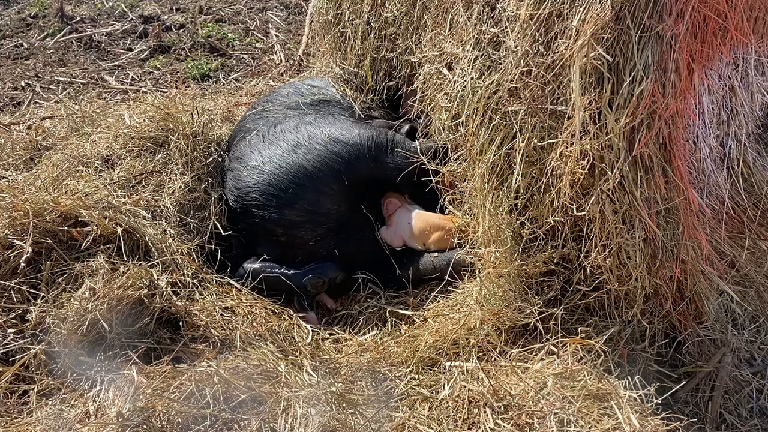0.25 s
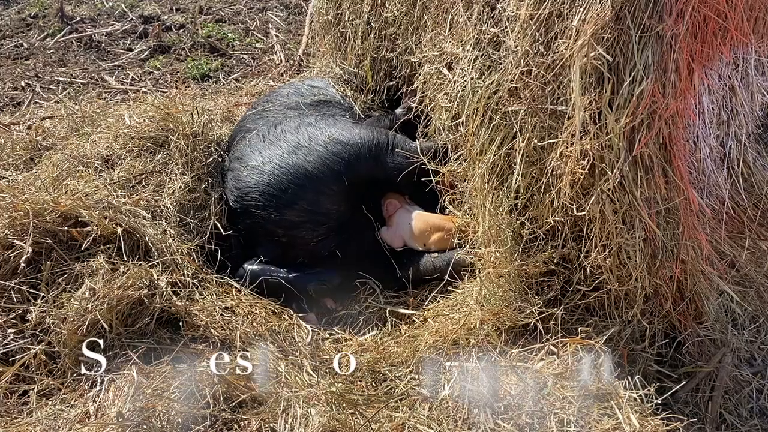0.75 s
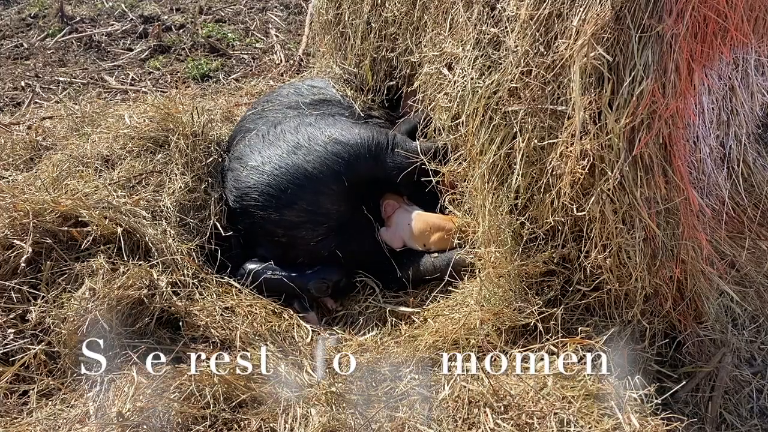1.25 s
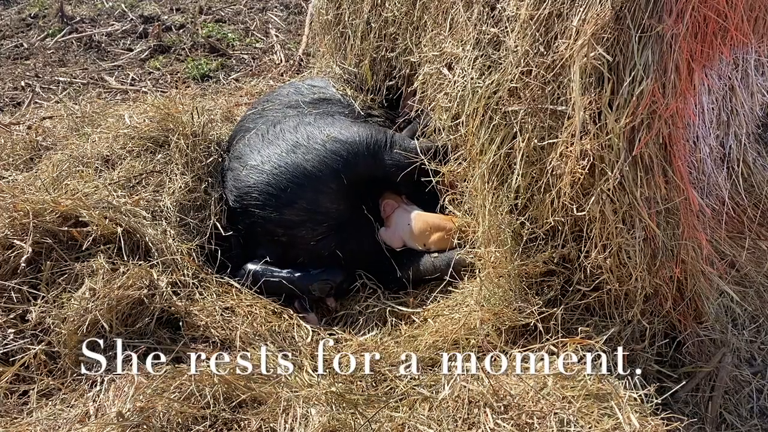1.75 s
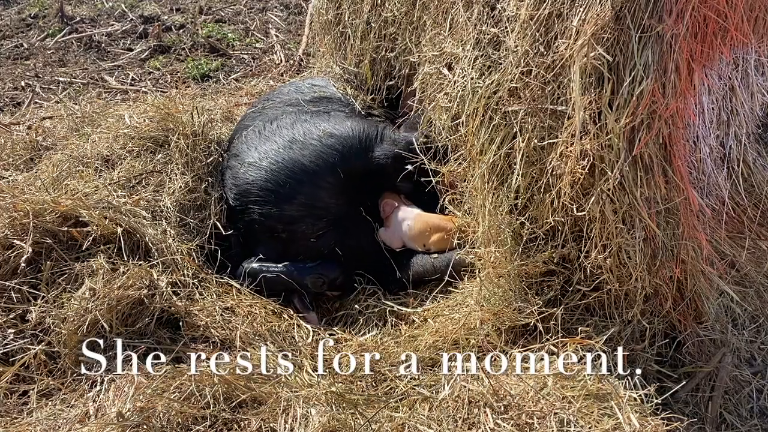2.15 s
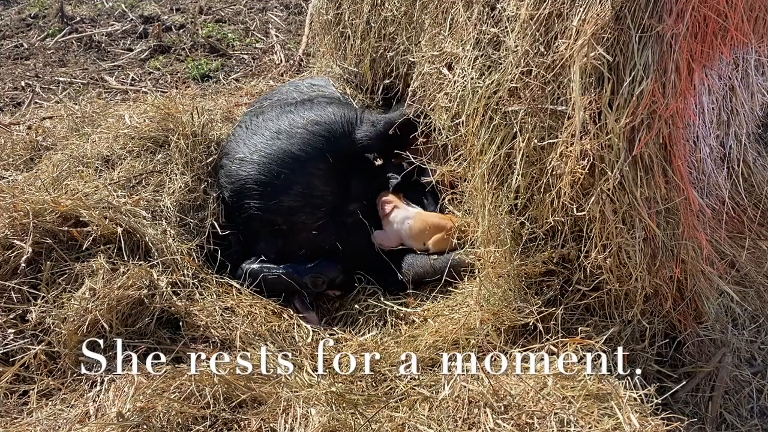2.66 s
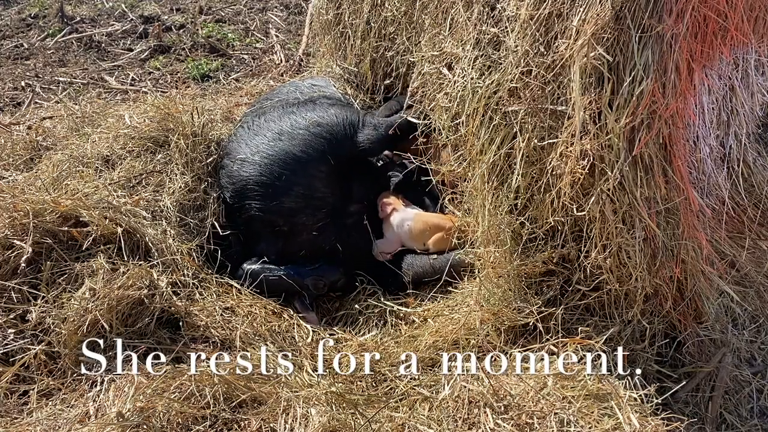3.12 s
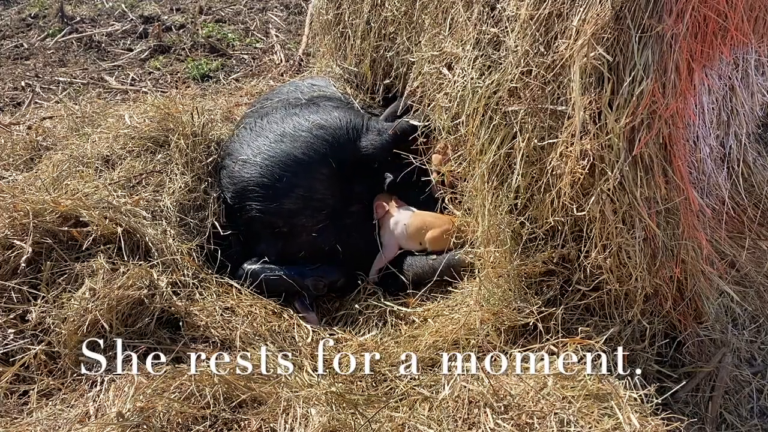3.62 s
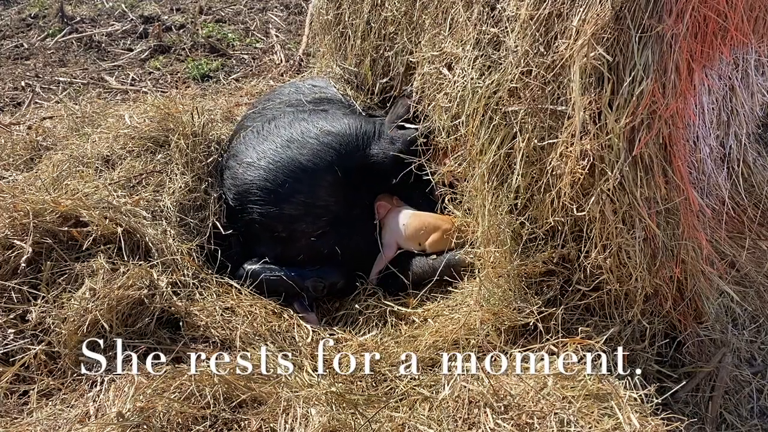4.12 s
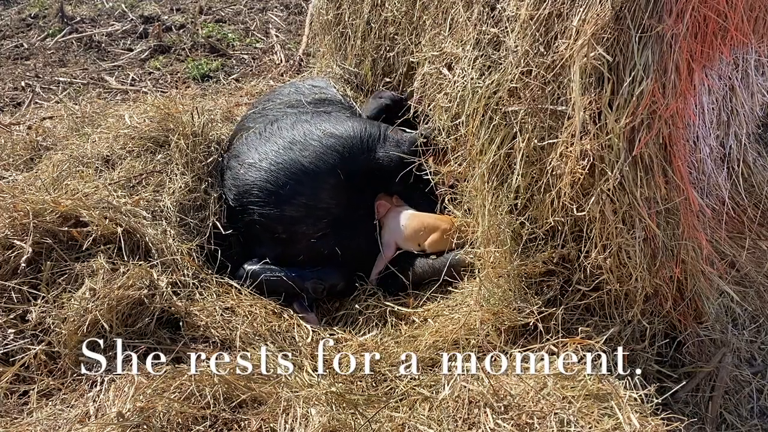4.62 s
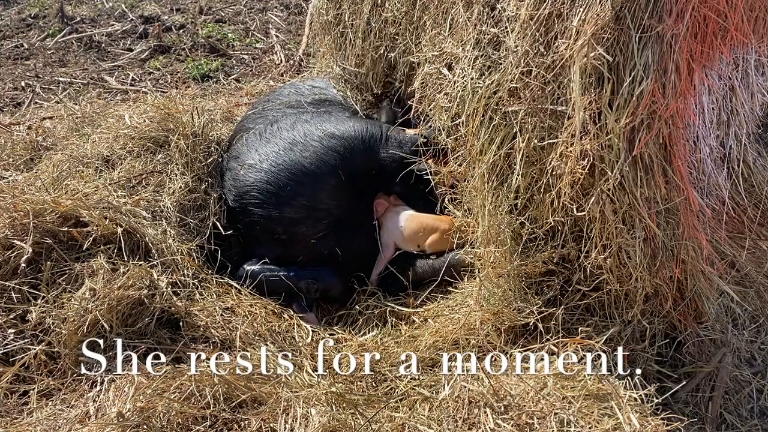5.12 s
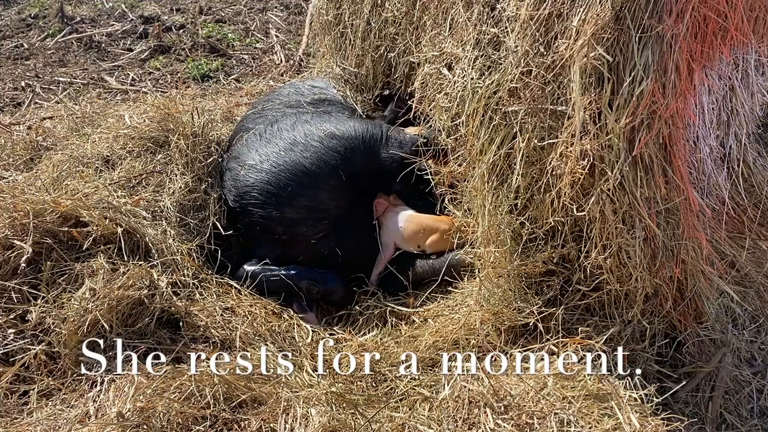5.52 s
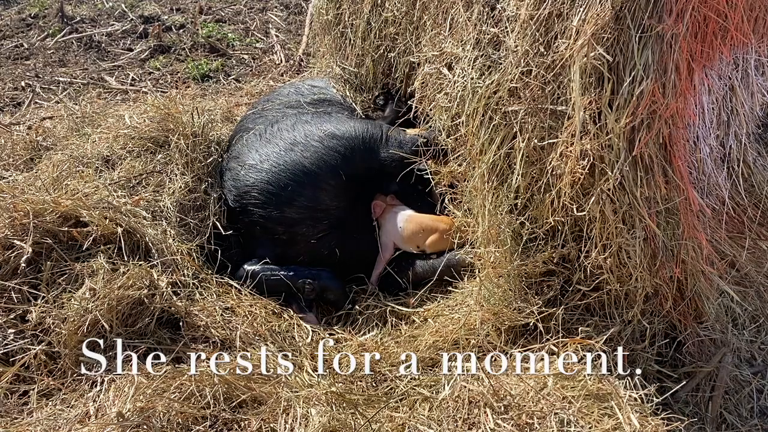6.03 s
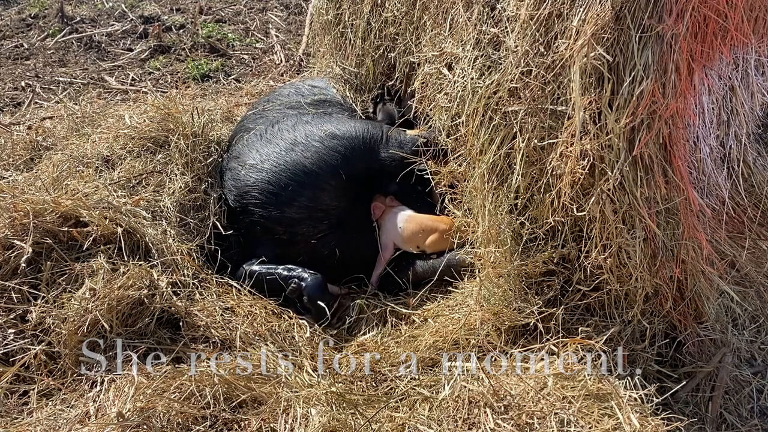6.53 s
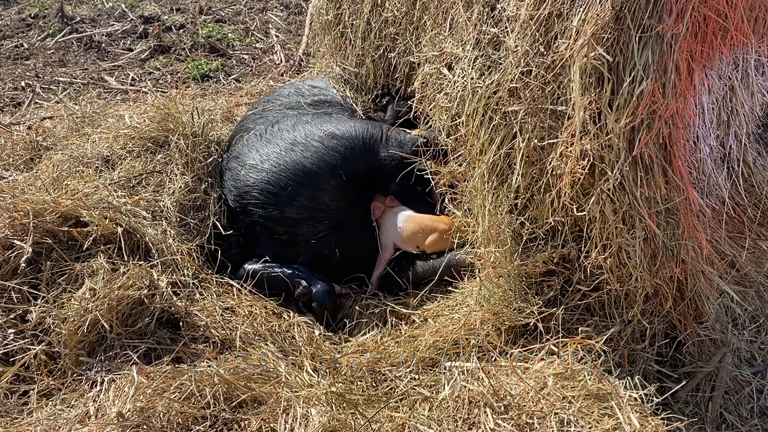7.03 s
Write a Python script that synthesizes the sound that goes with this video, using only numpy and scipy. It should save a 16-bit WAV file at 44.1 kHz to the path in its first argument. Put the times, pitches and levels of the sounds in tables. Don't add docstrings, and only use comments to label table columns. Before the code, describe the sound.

A newborn piglet gives two thin, hoarse squeals, then short creaky grunts in a hay nest, with stalks snapping and wind rumbling on the microphone.

```python
import sys
import numpy as np
from scipy import signal
from scipy.fft import rfft, irfft
from scipy.io import wavfile
from scipy.ndimage import uniform_filter1d

SR = 44100
rng = np.random.default_rng(int(sys.argv[2]) if len(sys.argv) > 2 else 0)


def nominal_scale(level):
    x = np.asarray(level, float) / 20
    return 10 ** x


def wav_out(sig):
    wavfile.write(sys.argv[1], SR, np.round(np.clip(np.atleast_2d(sig).T, -1, 1) * 32767).astype(np.int16))


N = 320607

# time_s, gust_db, breeze_db
WIND = [(0.0, -46, -51), (0.1, -43.5, -57.5), (0.32, -51.5, -55), (0.44, -43, -57), (1.6, -41.5, -54),
        (1.9, -49, -50.5), (2.53, -37.5, -55.5), (3.12, -40, -56.5), (3.32, -53, -55), (3.81, -47, -55.5),
        (4.27, -45, -59.5), (5.0, -45.5, -56.5), (5.45, -52, -63), (6.3, -42.5, -62), (6.84, -46.5, -63.5),
        (7.0, -53, -61.5), (7.1, -44, -65), (7.27, -50.5, -55)]
# frequency_hz, level_db
DEEP_SPECTRUM = [(20, -48.5), (35, -16.5), (50, -5.5), (75, -0.5), (100, 0.5), (140, -15), (200, -84.5)]
RUMBLE_SPECTRUM = [(50, -71.5), (80, -13), (125, 7), (200, 1), (300, -9), (450, -23.5), (700, -97.5)]
ROAR_SPECTRUM = [(100, -33), (170, -6), (300, 2), (500, -0.5), (800, -3.5), (1200, -17.5), (1800, -27.5),
                 (3000, -32), (7000, -33), (15000, -52.5)]
# top_s, rise_s, fall_s, level_db
HAY_STIRS = [(0.122, 0.007, 0.0334, -45), (0.33, 0.36, 0.127, -72), (0.72, 0.26, 0.23, -58.5),
             (1.07, 0.2, 0.099, -63), (1.36, 0.112, 0.098, -56), (1.68, 0.126, 0.202, -60.5),
             (2.05, 0.23, 0.105, -69.5), (2.411, 0.296, 0.0975, -53), (2.58, 0.053, 0.33, -63.5),
             (3.05, 0.188, 1, -66), (3.509, 0.052, 0.306, -55.5), (3.92, 0.16, 0.02, -68),
             (4.15, 0.232, 0.099, -61), (4.82, 0.573, 0.195, -64), (5.4, 0.73, 0.031, -74),
             (5.455, 0.022, 0.051, -70.5), (5.65, 0.39, 0.218, -74.5), (6.05, 0.024, 0.91, -78),
             (6.57, 0.446, 0.052, -73.5), (7.25, 1, .3, -78.5)]
# frequency_hz, level_db
HISS_SPECTRUM = [(900, 9), (1800, -9), (2700, -9.5), (4000, -2.5), (5500, -8.5), (8000, -4.5), (10000, 1.5),
                 (12000, -1), (14000, -4), (15700, -11.5)]
# top_of_arch_s, top_pitch_hz, length_s, level_db
BIRD_CALLS = [
    (2.48, 785, .12, -47),
    (3.25, 780, .12, -48),
    (3.99, 778, .12, -48),
    (4.538, 778, .12, -50),
]
# harmonic_number, level_db
BIRD_HARMONICS = [
    (2, 0),
    (3, -11),
    (5, -27),
]
# start_s, pitch_hz, length_s, level_db
CHIRP = (7.095, 6700, .045, -64)
# start_s, peak_db, centre_hz
SNAPS = [(0.001, -43, 2500), (0.0074, -38, 2050), (0.009, -44, 3700), (0.017, -41.5, 2500),
         (0.023, -44.5, 4090), (0.029, -40.5, 3230), (0.291, -44, 3200), (0.121, -32, 4920),
         (1.236, -36, 2100), (1.4746, -33.5, 7500), (1.927, -41, 3200), (2.6789, -38.5, 8000),
         (3.4756, -37, 8000), (1.673, -26.5, 2176), (1.6808, -32.5, 2500), (2.4984, -34, 1980),
         (2.984, -34, 5800), (3.1124, -36, 4300), (3.162, -44.5, 2000), (3.2576, -37, 4200),
         (3.504, -27, 6400), (3.5306, -18.5, 8020), (3.7233, -29, 10400), (3.867, -30.5, 12300),
         (3.87, -43.5, 3360), (3.917, -29, 11300), (3.919, -45, 2600), (4.2145, -54.5, 3200),
         (4.2127, -50.5, 10300), (5.3014, -39.5, 10500), (5.38, -50, 5000), (5.445, -31.5, 10480),
         (5.465, -45, 9000), (5.522, -42.5, 2500), (5.6275, -46, 6060), (5.2137, -44, 7980),
         (5.2905, -53, 9000), (5.6083, -50, 8000), (5.929, -58.5, 7000), (5.9444, -57.5, 4000),
         (5.972, -59, 2600), (5.9794, -57.5, 3600), (5.996, -56.5, 8000), (6.0557, -55.5, 9000),
         (6.179, -49.5, 9000), (6.2423, -54, 8000), (6.277, -59, 4000), (6.2987, -43.5, 9000),
         (6.555, -41, 11800), (6.8639, -59, 8000), (6.95, -59.5, 3700), (7.0804, -50, 6600),
         (7.176, -56, 6000), (7.2241, -38, 5900), (6.6925, -45.5, 3200)]
# start_s, peak_db, resonance_hz
THUDS = [
    (2.515, -44.5, 898),
    (3.19, -43.5, 716),
    (5.599, -64, 1710),
    (6.659, -44.5, 675),
]
# time_s, level_db
SNORT = [
    (0.09, -81.5),
    (0.126, -62),
    (0.235, -78.5),
]
# frequency_hz, level_db
SNORT_SPECTRUM = [(750, -7.5), (1150, 11.5), (1550, 7.5), (2500, -4), (4500, 5.5), (5800, -7),
                  (9000, -10.5), (12500, -12), (15000, -13.5)]
# start_s, length_s, top_pitch_hz, level_db
YIPS = [
    (1.245, 0.0281, 1378, -53.5),
    (1.262, .046, 1759, -58),
]
# start_s, length_s, from_hz, to_hz, level_db
STRANDS = [(0.502, 0.0327, 4750, 5050, -45), (0.535, 0.145, 2480, 2310, -58),
           (0.53, 0.11, 5400, 5600, -62.5), (0.75, .09, 5204, 4980, -57), (0.785, .07, 2300, 2600, -66),
           (0.985, 0.153, 1980, 2121, -56), (1.022, 0.253, 2275, 2474, -58),
           (1.057, 0.11, 3910, 3653, -56.5), (1.245, 0.056, 4200, 4300, -57.5),
           (1.375, 0.0445, 3156, 2726, -57.5), (1.443, 0.034, 3047, 2760, -54),
           (5.19, .12, 2455, 2502, -77.5)]
# first_pulse_s, last_pulse_s, pulse_count, mouth_shape_index
GRUNTS = [(1.36, 1.433, 4, 0), (1.457, 1.675, 10, 11), (1.8, 1.8635, 4, 1), (1.997, 2.061, 4, 2),
          (2.1705, 2.28, 6, 3), (2.566, 2.692, 6, 4), (4.7, 4.925, 10, 5), (5.066, 5.242, 8, 6),
          (5.722, 5.861, 6, 7), (6.04, 6.222, 9, 8), (6.2455, 6.3635, 6, 8), (6.882, 6.968, 4, 9),
          (7.171, 7.25, 4, 10)]
# place_of_top (0-1), chest_db, mouth_db, bend_db
GRUNT_EFFORT = [(0.37, -38.5, -48.5, 13), (0.21, -48.5, -46, 5), (0.57, -37, -46, 45.5),
                (0.36, -35, -46, 28.5), (0.51, -35.5, -46, 57.5), (0.48, -38, -50.5, 65.5),
                (0.39, -48, -74.5, 15), (0.45, -47.5, -82.5, 50), (0.0, -50, -65, 56),
                (0.62, -48, -68, 35.5), (1.0, -52, -66, 8.5), (0.68, -55.5, -63.5, 44),
                (0.54, -39, -56, 91.5)]
# frequency_hz, width_hz, level_db
CHEST = [
    (300.4, 38.2, 0),
    (706.6, 51.8, -4),
    (1190, 138, -9),
]
# frequency_hz, width_hz, level_db
MOUTHS = [
    [(1120, 110, 4), (1430, 120, 0), (1850, 100, -9)],
    [(1150, 200, 8), (1350, 120, 8), (2450, 200, -4), (3060, 200, -3), (3530, 200, -1), (5000, 150, 1)],
    [(1330, 120, 2), (1930, 100, 0), (2200, 150, -4), (2500, 110, -4), (3050, 150, -12)],
    [(1900, 100, -6), (2250, 110, -5), (3150, 180, 1), (3600, 220, 0), (4720, 130, -15), (5600, 200, -15)],
    [(620, 150, 18), (1100, 200, 8), (2220, 150, -2)],
    [(2500, 250, -6), (3500, 250, 0), (4400, 300, 0)],
    [(2500, 200, 0), (3050, 200, -3), (4600, 250, 0)],
    [(3480, 170, 0), (5000, 400, -14)],
    [(2540, 120, -6), (3160, 130, 0), (5000, 250, 1)],
    [(3300, 200, -3), (3700, 250, 0)],
    [(720, 90, 6), (1770, 120, 0), (2670, 160, -6), (3080, 120, 1), (3620, 160, -2), (4700, 400, -3)],
    [(625, 70, 6), (1080, 110, 0), (1400, 150, -12)],
]
# time_s, middle_partial_hz, effort_db, low_partial_over_effort_db
WHINE = [(0.97, 3050, -46.5, -8.5), (1.005, 3050, -52.5, -3.5), (1.04, 3110, -51.5, -2.5),
         (1.09, 3020, -59, 4.5), (1.16, 2943, -57, -1), (1.195, 3220, -58.5, 0), (1.225, 3380, -61.5, -0.5),
         (1.3, 3350, -67.5, -3.5)]
WHINE_TAIL = [(1.232, 3260, -57.5, -2.5), (1.27, 3190, -49, -9), (1.315, 3120, -53.5, -7),
              (1.372, 3192, -41, -16), (1.4, 3189, -54.5, -6), (1.47, 3180, -55, -5),
              (1.52, 3096, -60.5, -6), (1.57, 3225, -60.5, -8.5), (1.665, 3110, -65, -10.5)]
# time_s, whistle_hz, effort_db, rasp_over_effort_db, octave_over_effort_db
SQUEAL = [
    [(0.41, 2835, -72.5, 9, -17), (0.464, 3416, -65, -23, -14), (0.482, 3560, -58, 5.5, -5)],
    [(0.482, 3493, -48, -0.5, -1.5), (0.498, 3430, -45, -1.5, 1.5), (0.518, 3690, -45.5, 4.5, -14),
     (0.546, 3286, -44, 0.5, -8), (0.602, 3376, -43, -4, -2.5), (0.625, 3380, -44.5, -1.5, -10),
     (0.69, 3433, -48, -4.5, -14)],
    [(0.686, 3495, -52, -4, -15.5), (0.74, 3535, -41.5, -20.5, -15), (0.76, 3558, -44, -9.5, -13),
     (0.805, 3574, -37.5, -15, -20.5), (0.826, 3524, -39, -13, -16), (0.846, 3432, -42.5, -4, -13)],
    [(0.846, 3500, -52, -4, -19.5), (0.876, 3552, -45, -10, -25), (0.966, 3487, -59.5, -11, -22),
     (0.98, 3566, -59, -9, -21.5), (1.05, 3527, -66, -8.5, -22)],
]
SQUEAL_ROUGH = [.4, .4, .45, .95]
SQUEAL_BREAK = [0, 0, .2, 0]
# time_s, pitch_hz
RASP_PITCH = [(0.41, 4660), (0.5, 4525), (0.545, 4440), (0.575, 4587), (0.65, 4368), (0.71, 4490),
              (0.77, 4844), (0.82, 4777), (0.9, 4404)]
# frequency_hz, level_db
BREATH_SPECTRUM = [(1200, 1.5), (2100, 0), (2900, -0.5), (4500, 9.5), (5600, -4.5), (8000, -17),
                   (11000, -6.5), (13000, -37.5)]
# frequency_hz, lead_rad
NEST_TURN = [(0, 0), (340, 1.5), (860, 2.7), (1400, 3.5), (2400, 5.6), (3450, 8.1), (3960, 8.6),
             (4480, 10.3), (5000, 11.2), (6030, 15.7), (6600, 18.2), (7100, 18.6), (15400, 6.3),
             (22050, 6.3)]
FIELD_TURN = [(0, 0), (200, .6), (340, 1.4), (600, 2.4), (900, 2.9), (1400, 2.8), (1900, .9), (2400, 0),
              (7000, 0), (15400, -12.5), (22050, -12.5)]
FRONT_TURN = [(0, 0), (1400, 0), (2100, .7), (3000, 1), (4100, .8), (5500, 0), (7000, 0), (15400, -12.5),
              (22050, -12.5)]
# frequency_hz, left_minus_right_db
LEFT_OVER = [(60, 3), (210, 4), (770, 5), (1200, 1), (1800, 1), (2700, 2.5), (4200, 3), (6400, .5),
             (15000, 0)]


def evened(x):
    return x / np.sqrt(np.mean(abs(x) ** 2) + 1e-20)


def drift(n, size, passes=1):
    x = rng.standard_normal(n)
    for _ in range(passes):
        x = uniform_filter1d(x, size=size)
    return evened(x)


def read(points, hz):
    f, value = np.transpose(points)
    return np.interp(np.log(hz + 1), np.log(f + 1), value)


def curves(rows):
    s, *columns = np.transpose(rows)
    t = np.arange(s[0], s[-1], 1 / SR)
    return s[0], [np.interp(t, s, c) for c in columns]


def add(mix, s, sound):
    part = mix[max(round(s * SR), 0):][:len(sound)]
    part += sound[:len(part)]


def coloured(n, points):
    z = rfft(rng.standard_normal(n))
    return evened(irfft(z * nominal_scale(read(points, np.fft.rfftfreq(n, 1 / SR))), n))


def whistle(hz, width_hz, rough):
    r = np.exp(-np.pi * width_hz / SR)
    flutter = rng.standard_normal(len(hz)) + 1j * rng.standard_normal(len(hz))
    flutter = evened(signal.lfilter([1], np.convolve([1, -r], [1, -r]), flutter))
    rough = np.clip(rough, 0, 1)
    envelope = np.sqrt(1 - rough ** 2) + rough * flutter
    return np.sqrt(2) * (envelope * np.exp(2j * np.pi * np.cumsum(hz) / SR)).real


def ring(modes, detune, rise):
    t = np.arange(1300) / SR
    x = np.zeros(len(t))
    for (hz, width_hz, db), d in zip(modes, detune):
        x += nominal_scale(db) * np.exp(-np.pi * width_hz * t) * np.sin(2 * np.pi * hz * d * t)
    x = x * (1 - np.exp(-t / rise)) ** 2
    return x / np.linalg.norm(x)


def air(points, patchy_db, flicker_db, same, size=1024):
    frames, hz = 4 * N // size + 5, np.fft.rfftfreq(size, 1 / SR)
    a, b, c, d, patches = rng.standard_normal((frames, len(hz), 5)).T
    patches = evened(uniform_filter1d(uniform_filter1d(patches, size=10, axis=0), size=10, axis=1))
    left = a + 1j * b
    z = np.array([left, same * left + np.sqrt(1 - same ** 2) * (c + 1j * d)])
    z *= nominal_scale(read(points, hz)[:, None] + patchy_db * patches + flicker_db * drift(frames, 3))
    return evened(signal.istft(z, nperseg=size, noverlap=3 * size // 4)[1][:, :N])


def reflected(x, tail, db):
    return nominal_scale(db) * signal.fftconvolve(x[None], tail / np.linalg.norm(tail[0]), axes=1)[:, :N]


def ports(x, turn):
    hz = np.fft.rfftfreq(N, 1 / SR)
    right = rfft(x[1]) * nominal_scale(-read(LEFT_OVER, hz)) * np.exp(-1j * np.interp(hz, *np.transpose(turn)))
    return np.array([x[0], irfft(right, N)])


def wind():
    s, *levels = np.transpose(WIND)
    gust_db, breeze_db = (np.interp(np.arange(N) / SR, s, db) for db in levels)
    over_calm_db = gust_db + 46
    deep_db = -47 + 0.12 * over_calm_db
    roar_db = breeze_db + 0.254 * over_calm_db
    x = nominal_scale(deep_db) * air(DEEP_SPECTRUM, patchy_db=0.34, flicker_db=0.62, same=1.0, size=4096)
    x += nominal_scale(gust_db + 2.5) * air(RUMBLE_SPECTRUM, patchy_db=2.5, flicker_db=0.4942, same=0.915, size=2048)
    return x + nominal_scale(roar_db + 8.5) * air(ROAR_SPECTRUM, patchy_db=2.5, flicker_db=1.94, same=.6)


def hay():
    edge_db, rest_db = 11.5, -96
    crackles_per_s = 260
    size = nominal_scale(5.1 * np.minimum(rng.exponential(1, N), 2.6)) * (rng.random(N) < crackles_per_s / SR)
    crackle = signal.oaconvolve(size, coloured(64, HISS_SPECTRUM) * np.hanning(64))[:N]
    smooth = air(HISS_SPECTRUM, patchy_db=.7, flicker_db=1.2, same=.9, size=512)
    t = np.arange(0, N + 64, 64) / SR
    power = nominal_scale(rest_db) ** 2
    for s, rise, fall, db in HAY_STIRS:
        power = power + nominal_scale(db - edge_db * np.maximum((s - t) / rise, (t - s) / fall)) ** 2
    level_db = np.interp(np.arange(N) / SR, t, 10 * np.log10(power))
    return nominal_scale(level_db + 5.5) * smooth + nominal_scale(0.653 * level_db - 23.5) * evened(crackle)


def bird():
    out = np.zeros(N)
    for s, hz, length, db in BIRD_CALLS:
        u = np.linspace(-1, 1, round(length * SR))
        turns = np.cumsum(hz * (1 - .3 * u ** 2)) / SR
        call = np.zeros(len(u))
        for k, tone_db in BIRD_HARMONICS:
            shape = np.cos(np.pi * u / 2) ** (1.7 if k == 2 else .4)
            loss_db = (k > 2) * (7 * u + 5 * (1 - u ** 2))
            call += nominal_scale(tone_db - loss_db) * np.sin(2 * np.pi * k * turns) * shape
        call = call * (1 + .15 * drift(len(u), 200))
        add(out, s - length / 2, nominal_scale(db + 1) * call)
    t = np.arange(SR // 2) / SR
    tail = rng.standard_normal((2, len(t))) * nominal_scale(-60 * t / 1.6) * (t > .03)
    tail = signal.lfilter(*signal.butter(4, 1750, fs=SR), tail)
    echo = reflected(out, tail, -21)
    s, hz, length, db = CHIRP
    n = round(length * SR)
    add(out, s, nominal_scale(db) * whistle(np.full(n, hz), 71, rough=0.78) * signal.windows.tukey(n, .6))
    return out + echo


def snaps():
    out, t = np.zeros(N), np.arange(400) / SR
    for s, db, hz in SNAPS:
        tick = coloured(400, [(hz / 4, -16), (hz * 0.43, -3), (hz, 0), (hz * 1.637, -5), (hz * 2.54, -24)])
        add(out, s, nominal_scale(db - 9.0) * tick * np.exp(-t * hz / 8.73) * np.minimum(t / 0.000315, 1))
    return out


def thuds():
    out = np.zeros(N)
    for s, db, hz in THUDS:
        add(out, s, 12 * nominal_scale(db) * ring([(hz, 90, 0)], [1], rise=0.00126))
    return out


def snort():
    s, (db,) = curves(SNORT)
    spit = nominal_scale(2.96 * drift(len(db), 90))
    blast = nominal_scale(db + 18) * evened(spit * coloured(len(db), SNORT_SPECTRUM))
    return s, (blast * signal.windows.tukey(len(db), .2))[:, None]


def yips():
    out = np.zeros(N)
    for s, length, hz, db in YIPS:
        u = np.linspace(0, 1, round(length * SR))
        bend = np.interp(u, [0, .2, .3, 1], [.75, 1, 1, .62])
        add(out, s, nominal_scale(db) * whistle(hz * bend, 150, rough=.5) * signal.windows.tukey(len(u), .3))
    return out


def strands():
    out = np.zeros(N)
    for s, length, from_hz, to_hz, db in STRANDS:
        hz = np.linspace(from_hz, to_hz, round(length * SR))
        add(out, s, nominal_scale(db) * whistle(hz, 90, rough=.75) * signal.windows.tukey(len(hz), .5))
    return out


def grunts():
    out, t = np.zeros(N), np.arange(300) / SR
    chest_bend = 0.582
    mouth_edge = .2
    for (first, last, count, shape), (top, chest_db, mouth_db, bend_db) in zip(GRUNTS, GRUNT_EFFORT):
        size = np.sqrt((last - first) / (count - 1) * SR)
        mouth_db = mouth_db + bend_db * mouth_edge / 16
        for s in np.linspace(first, last, count):
            sag_db = bend_db * ((s - first) / (last - first) - top) ** 2
            push, late = rng.standard_normal(2)
            puff = .045 * rng.standard_normal(len(t)) * np.exp(-t / .003)
            puff[0] = 1
            low = ring(CHEST, 1 + 0.0058 * rng.standard_normal(3), rise=.0015)
            low = nominal_scale(chest_db - chest_bend * sag_db + 2.5 + 0.34 * push) * low
            modes = [(hz, width_hz, db + 1.2 * rng.standard_normal()) for hz, width_hz, db in MOUTHS[shape]]
            detune = 1 + .01 * np.clip(rng.standard_normal(len(modes)), -2, 2)
            high = np.convolve(ring(modes, detune, rise=.0006), puff / np.linalg.norm(puff))
            high = nominal_scale(mouth_db - (1 + mouth_edge) * sag_db + 2.5 + .8 * push) * high
            add(out, s + .0004 * late, size * low)
            add(out, s + .0004 * late, size * high)
    return out


def whine(rows):
    s, (hz, db, low_over) = curves(rows)
    climb = np.sin((s - WHINE[0][0] + np.arange(len(hz)) / SR) * 3.2)
    low_hz, high_hz = 2041 + 273 * climb, 3972 + 186.3 * climb
    low_db, high_db = db + low_over, -57.5 + 0.55 * (db - db.mean())
    x = nominal_scale(db + 1.5) * whistle(hz, 90, rough=.85)
    x += nominal_scale(low_db - 1.5) * whistle(low_hz, 370, rough=1.0)
    x += nominal_scale(high_db) * whistle(high_hz, 256, rough=1.0)
    x += nominal_scale(low_db) * coloured(len(hz), BREATH_SPECTRUM)
    return s, x * signal.windows.tukey(len(x), .08)


def squeal(rows, rough, fall):
    s, (hz, tone_db, rasp_over, octave_over) = curves(rows)
    n = len(hz)
    rasp_db, octave_db = tone_db + rasp_over, tone_db + octave_over
    breath_db = tone_db - 11.5 + 0.2 * rasp_over
    to_end = np.arange(n)[::-1]
    hz = hz * (1 - fall * np.exp(-to_end / SR / .007))
    x = nominal_scale(tone_db + 7) * whistle(hz, 192, rough)
    x += nominal_scale(octave_db) * (whistle(2 * hz, 150, rough=.85) + nominal_scale(-8) * whistle(3 * hz, 300, rough=.9))
    rasp_hz = np.interp(s + np.arange(n) / SR, *np.transpose(RASP_PITCH)) + 30 * drift(n, 900, passes=2)
    rasp = whistle(rasp_hz, 192, rough=1.0) + nominal_scale(-13.0) * whistle(rasp_hz + 450, 700, rough=0.96)
    x += nominal_scale(rasp_db + 4.0) * rasp
    sums = whistle(hz + rasp_hz, 260, rough=0.85) + whistle(2 * hz + rasp_hz, 490, rough=0.6)
    x += nominal_scale(rasp_db - 16.0) * sums
    x += nominal_scale(breath_db + 12) * coloured(n, BREATH_SPECTRUM)
    return s, x * np.minimum(np.minimum(np.arange(n), to_end) / 130, 1)


def scene():
    nest = grunts() + strands()
    for s, sound in (*map(squeal, SQUEAL, SQUEAL_ROUGH, SQUEAL_BREAK), whine(WHINE), whine(WHINE_TAIL)):
        add(nest, s, sound)
    t = np.arange(4000) / SR
    bale = rng.standard_normal((2, len(t))) * nominal_scale(-60 * t / .11) * (t > .003)
    nest = nest + reflected(nest, bale, -14)
    wall = signal.lfilter(*signal.butter(3, [900, 2300], 'bandpass', fs=SR), bale * (t < .05))
    slap = reflected(nest[0], wall, -28)
    nest = nest + np.pad(slap, ((0, 0), (round(.085 * SR), 0)))[:, :N]
    front = yips() + snaps() + thuds()
    front = front + reflected(front, bale, -16)
    add(front.T, *snort())
    field = wind() + hay() + bird()
    return ports(nest, NEST_TURN) + ports(front, FRONT_TURN) + ports(field, FIELD_TURN)


def top_cut(x):
    return signal.sosfilt(signal.butter(12, 16830, fs=SR, output="sos"), x)


def record(dry):
    edge_hz, lead_db = 15850, 7
    hole_hz, hole_db = 13600, -41.5
    hz, _, z = signal.stft(np.array([dry[0] + dry[1], dry[0] - dry[1]]) / 2, SR, nperseg=1024)
    power = uniform_filter1d(uniform_filter1d(abs(z) ** 2, size=15, axis=1), size=3, axis=2) + 1e-20
    always = hz < [[7500], [1900]]
    kept = (power * nominal_scale(2 * lead_db) > power[::-1]) | always[:, :, None]
    treble = power[:, (hz > 3000) & (hz < 8000)].sum((0, 1))
    kept &= ~((hz > hole_hz)[:, None] & (treble > nominal_scale(2 * hole_db)))
    mid, side = signal.istft(z * kept * (hz < edge_hz)[:, None], SR, nperseg=1024)[1][:, :N]
    return top_cut(np.array([mid + side, mid - side]))


dry = scene()
out = record(dry)
wav_out(out)
```